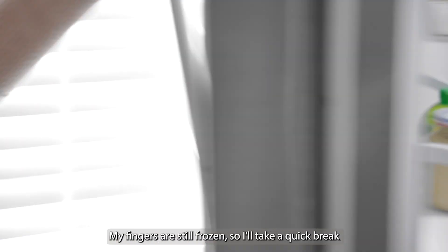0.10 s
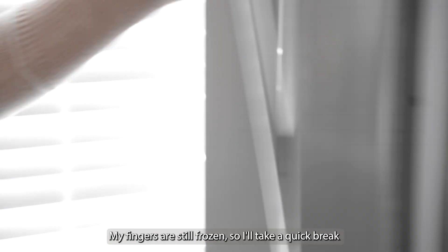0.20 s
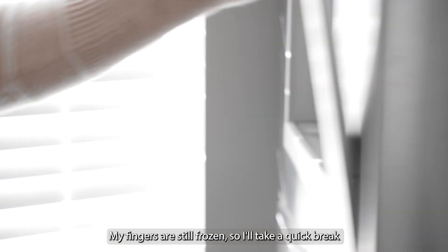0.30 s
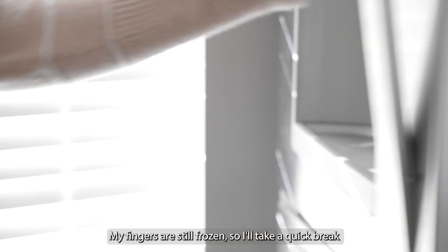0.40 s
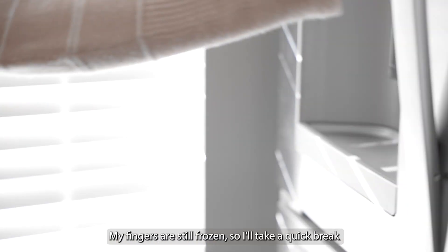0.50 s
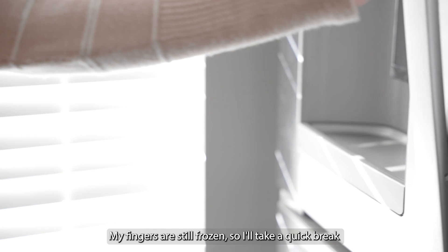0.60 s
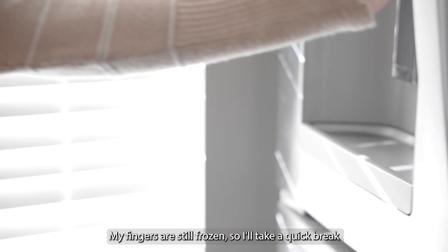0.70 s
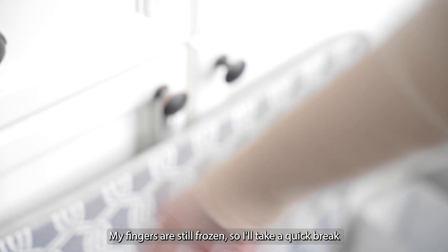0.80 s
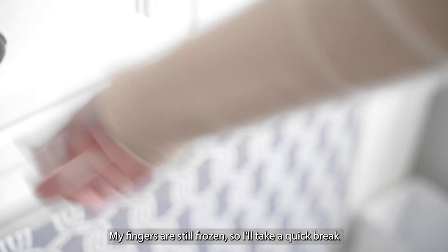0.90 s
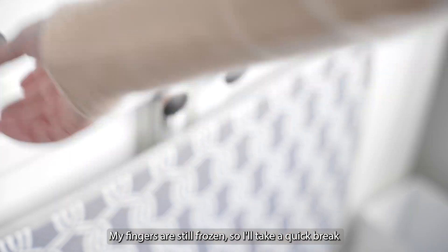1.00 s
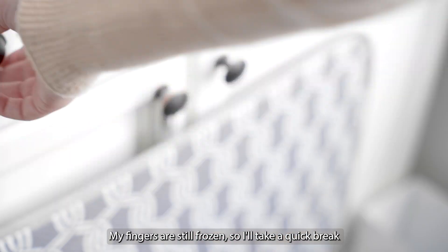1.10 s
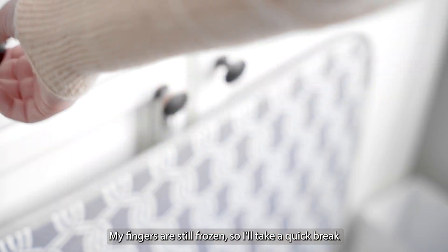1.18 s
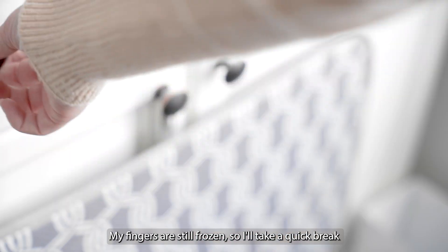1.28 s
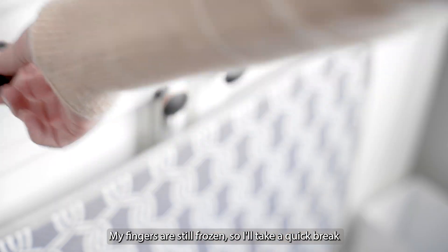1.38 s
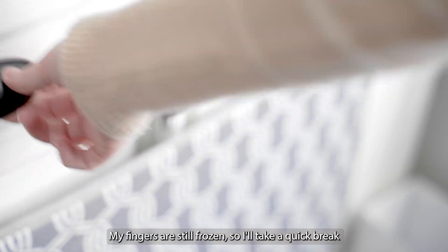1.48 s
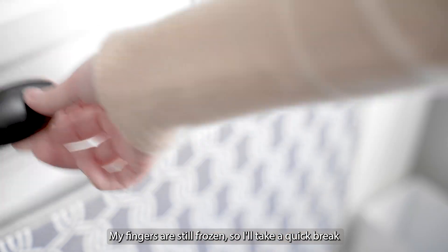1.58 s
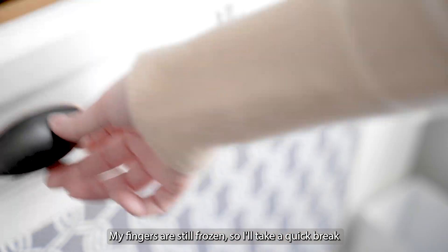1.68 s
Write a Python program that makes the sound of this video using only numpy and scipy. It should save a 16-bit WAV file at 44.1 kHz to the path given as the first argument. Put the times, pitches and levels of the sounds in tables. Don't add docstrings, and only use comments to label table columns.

```python
import sys
import numpy as np
from scipy import signal
from scipy.fft import rfft, irfft
from scipy.io import wavfile
from scipy.ndimage import uniform_filter1d

SR = 44100
rng = np.random.default_rng(int(sys.argv[2]) if len(sys.argv) > 2 else 0)


def voltage_ratio(decibels):
    exponent = np.asarray(decibels, float) / 20
    return 10 ** exponent


def master(y):
    cut = np.clip(np.atleast_2d(y).T, -1, 1)
    pcm = np.round(cut * 32767)
    wavfile.write(sys.argv[1], SR, pcm.astype(np.int16))


N = 74970


def evened(x):
    return x / np.sqrt(np.mean(x ** 2) + 1e-20)


def read(points, hz):
    table_hz, value = np.transpose(points)
    return np.interp(np.log(hz + 1), np.log(table_hz + 1), value)


def curve(rows, column=1):
    rows = np.array(rows)
    return np.interp(np.arange(N) / SR, rows[:, 0], rows[:, column])


def colour(x, points):
    hz, db = np.transpose(points)
    ends = [(1, db[0] - 30), *points, (hz[-1] * 1.5, db[-1] - 30)]
    log_gain = read(ends, np.fft.rfftfreq(8192, 1 / SR)) * np.log(10) / 20
    cepstrum = irfft(log_gain)
    cepstrum[1:4096] *= 2
    cepstrum[4097:] = 0
    taps = irfft(np.exp(rfft(cepstrum)))[:4096]
    return signal.oaconvolve(x, taps[None] / np.linalg.norm(taps), axes=1)[:, :N]


def resonate(x, hz, width):
    r = np.exp(-np.pi * width / SR)
    y = signal.lfilter([1, 0, -1], [1, -2 * r * np.cos(2 * np.pi * hz / SR), r * r], x)
    return y * np.sqrt((1 - r * r) / 2)


def body(x, modes):
    total = 0
    for k, (hz, width, db) in enumerate(modes):
        sign = (-1) ** k
        total = total + sign * voltage_ratio(db) * np.sqrt(width) * resonate(x, hz, width)
    return total / np.sqrt(sum(voltage_ratio(2 * db) * width for hz, width, db in modes))


# frequency in Hz, likeness from 0 to 1.
LIKENESS = [(60, 0.97), (150, 0.99), (300, 0.98), (600, 0.82), (1200, 0.62), (2500, 0.21), (8000, 0)]


def pair(spread_db):
    grain = voltage_ratio(spread_db * evened(uniform_filter1d(rng.standard_normal(N), 60)))
    a, b = rfft(rng.standard_normal((2, N)) * evened(grain))
    same = np.clip(read(LIKENESS, np.fft.rfftfreq(N, 1 / SR)), 0, 1)
    mid = np.sqrt((1 + same) / 2) * a
    side = np.sqrt((1 - same) / 2) * b
    return irfft(np.array([mid + side, mid - side]), N)


def decay(start, t60, rise_s=0.0023):
    t = np.maximum(np.arange(N) / SR - start, 0)
    return np.minimum(t / rise_s, 1) * voltage_ratio(-60 * t / t60)


def rung(rows, rise_s):
    t = np.arange(N) / SR
    return sum(voltage_ratio(db) * decay(s, t60, rise_s) * np.sin(2 * np.pi * hz * (t - s))
               for s, db, hz, t60 in rows)


# frequency in Hz, time to fall 60 dB in seconds.
ECHO_TIME = [(100, 0.92), (2000, 0.32), (16000, 0.15)]


def room(x):
    taps = np.zeros((2, SR // 2))
    slots = np.arange(160, SR // 2 - 20, 20)
    places = slots + rng.integers(0, 20, (2, len(slots)))
    signs = rng.choice([-1., 1.], (2, len(slots)))
    np.put_along_axis(taps, places, signs, 1)
    hz, t, z = signal.stft(taps, SR, nperseg=256)
    same = np.clip(read(LIKENESS, hz), 0, 1)[:, None]
    z = np.array([z[0], same * z[0] + np.sqrt(1 - same ** 2) * z[1]])
    fading = voltage_ratio(-60 * t / read(ECHO_TIME, hz)[:, None])
    tail = signal.istft(z * fading, SR, nperseg=256)[1]
    return signal.fftconvolve(x, tail / np.linalg.norm(tail[0]), axes=1)[:, :N]


# frequency in Hz, level in dB.
HISS_TONE = [(300, 3), (3000, -2), (11800, -4.5), (12300, 1.5), (15800, 1)]


def microphone_hiss():
    return voltage_ratio(-63) * colour(pair(0), HISS_TONE)


# frequency in Hz, level in dB.
DOOR_RUMBLE = [(25, -2), (180, -14), (300, -20), (900, -29), (2000, -32.5)]
# frequency in Hz, level in dB.
CORNER_RUMBLE = [(25, 0), (90, 4), (200, -9), (400, -12), (520, -37)]


def rumble(tone, level_db):
    return voltage_ratio(level_db) * colour(pair(0), tone)


# pitch in Hz, width in Hz, level in dB.
HUM_PARTS = [(270, 18, -2.5), (318, 16, -3.5), (394, 37, -9)]
# time in seconds, level in dB.
HUM_LOUDNESS = [(.6, -86.5), (.72, -63), (.9, -54.5), (1.05, -53.5), (1.2, -62.5)]


def compressor_hum():
    t = np.arange(N) / SR
    motor = voltage_ratio(2.5) * np.sin(2 * np.pi * 362.5 * t)
    shell = evened(body(pair(0), HUM_PARTS))
    return voltage_ratio(curve(HUM_LOUDNESS)) * (shell + motor)


# start in seconds, level in dB, fall time (60 dB) in seconds.
FINGER_TICKS = [
    (.872, -50, 0.04),
    (0.901, -53, 0.14),
    (0.959, -49, 0.13),
    (1.118, -45, 0.17),
]
# frequency in Hz, level in dB.
KNOB_TONE = [(400, 1), (580, 2.5), (820, -16), (1380, -4.5), (2600, -11), (5000, -27.5)]
# start in seconds, level in dB, fall time (60 dB) in seconds, centre in Hz.
RUB_PUFFS = [
    (0.984, -57.5, 0.32, 4900),
    (1.044, -51, 0.012, 12100),
]
# start in seconds, level in dB, pitch in Hz, fall time (60 dB) in seconds.
LOW_THUDS = [
    (.592, -44, 88.3, 0.29),
    (.957, -45, 1422, 0.048),
    (1.237, -32, 197.7, 0.16),
    (0.963, -26, 150, 0.042),
    (1.227, -30.5, 115.5, 0.26),
    (1.288, -36.5, 103.5, 0.24),
    (1.345, -31.5, 69.4, 0.23),
]


def fingers():
    noise = pair(3.6)
    touches = sum(voltage_ratio(db) * decay(s, t60, 0.0017) for s, db, t60 in FINGER_TICKS)
    out = colour(noise * touches, KNOB_TONE) + rung(LOW_THUDS, 0.0063)
    for s, db, t60, hz in RUB_PUFFS:
        tone = [(hz * 0.06, -5), (hz, 0), (hz * 1.7, -7)]
        out = out + voltage_ratio(db) * colour(noise * decay(s, t60, 0.0006), tone)
    return out


# start in seconds, level in dB.
CUTLERY_CLINKS = [
    (1.547, -46),
    (1.555, -41),
    (1.6, -47.5),
    (1.658, -28),
    (1.676, -41),
]
# frequency in Hz, level in dB.
STEEL_TONE = [(1250, 0), (2000, -8), (2650, 2), (3400, -4), (4320, 0), (4650, -9), (4950, -2), (5400, -18)]
# start in seconds, level in dB, pitch in Hz, fall time (60 dB) in seconds.
CUTLERY_RINGS = [
    (1.659, -41, 4323, .08),
    (1.659, -41, 4900, .05),
    (1.659, -42, 2650, .04),
    (1.555, -52, 4250, .04),
    (1.547, -56, 5300, .03),
]


def cutlery():
    clinks = sum(voltage_ratio(db) * decay(s, 0.062) for s, db in CUTLERY_CLINKS)
    return rung(CUTLERY_RINGS, 0.0009) + colour(pair(2.1) * clinks, STEEL_TONE)


# time in seconds, level in dB, brightness in dB per octave.
DRAWER_PULL = [(1.11, -85, -9.5), (1.13, -54.5, 3), (1.17, -56.5, -2.5), (1.22, -56, 0), (1.26, -54, 1.5),
               (1.33, -49.5, 0), (1.37, -45.5, 0), (1.42, -47, 1), (1.48, -45, 1.5), (1.54, -44.5, 2),
               (1.6, -45, 1.5), (1.7, -42.5, 2)]
# pitch in Hz, width in Hz, level in dB.
WOOD_PARTS = [(79.5, 47, 3.5), (180, 46, 2.5), (234, 35, 5), (317, 45.4, 6), (498, 140, -2), (590, 70, 6),
              (733, 180, -5.5), (1170, 83, -3.5), (1320, 100, -3.5), (1850, 360, -8), (2795, 830, -19.5)]
# frequency in Hz, level in dB.
RUNNER_TONE = [(40, -24), (230, -3.5), (600, -0.5), (850, -8), (2000, -15.5), (3500, -24.5), (6100, -29),
               (6600, -42), (9300, -34)]
# start in seconds, level in dB, pitch in Hz,
# fall time (60 dB) in seconds.
RUNNER_BUMPS = [(1.125, -48, 1110, 0.11), (1.165, -43, 189, 0.2), (1.227, -45, 1260, 0.094),
                (1.27, -41, 1940, .08), (1.309, -28.5, 253, .09), (1.361, -41, 535, 0.051),
                (1.385, -45, 783, 0.071), (1.395, -26.5, 249, 0.097), (1.404, -46, 1850, 0.089),
                (1.443, -31, 581, .09), (1.449, -28, 249.5, 0.079), (1.47, -36, 810, 0.094),
                (1.486, -28.5, 1110, 0.074), (1.488, -29, 247, 0.07), (1.515, -36, 252, .07),
                (1.524, -31, 807, .07), (1.535, -39, 1305, .08), (1.572, -32, 246, 0.088),
                (1.599, -31, 606, 0.094), (1.633, -30, 352.4, 0.12), (1.642, -30.5, 249.8, .07),
                (1.656, -26.5, 1225, 0.087), (1.66, -27, 543, 0.072), (1.678, -30, 1290, 0.088)]


def drawer():
    rub = pair(1.6) * voltage_ratio(curve(DRAWER_PULL))
    box = voltage_ratio(4) * colour(body(rub, WOOD_PARTS), [(30, 0.004), (4000, 0.0072)])
    rolling = box + voltage_ratio(-3) * colour(rub, RUNNER_TONE)
    hz, t, z = signal.stft(rolling, SR, nperseg=256)
    brightness = curve(DRAWER_PULL, column=2)[np.minimum((t * SR).astype(int), N - 1)]
    octaves = np.log2(np.maximum(hz, 320) / 320)[:, None]
    rolling = signal.istft(z * voltage_ratio(octaves * brightness), SR, nperseg=256)[1][:, :N]
    return rolling + rung(RUNNER_BUMPS, 0.0088)


# start in seconds, level in dB.
HANDLE_KNOCKS = [
    (0.127, -40.5),
    (0.144, -54),
    (.165, -56.5),
    (0.189, -42),
]
# frequency in Hz, level in dB.
HANDLE_TONE = [(380, -2), (680, 0.5), (950, -18.5), (1400, -5), (2400, -15.5), (3400, -22)]


def handle():
    knocks = sum(voltage_ratio(db) * decay(s, 0.18, 0.002) for s, db in HANDLE_KNOCKS)
    return colour(pair(3.5) * knocks, HANDLE_TONE)


# start in seconds, level in dB.
HARD_SNAPS = [
    (0.2168, -11),
    (0.223, -23.5),
    (0.3689, -18.5),
    (0.54, -20.5),
    (0.544, -19.5),
]


def snaps():
    x = np.zeros((2, N))
    for s, db in HARD_SNAPS:
        x[:, round(s * SR)] = 4 * voltage_ratio(db)
    return colour(x, [(300, -4.5), (1500, 7), (4000, -7.5), (12000, -25.5)])


# time in seconds, level in dB.
SEAL_LOUDNESS = [(0.215, -25), (.26, -36), (.33, -43), (0.401, -63.5), (0.53, -59.5), (0.546, -35),
                 (.59, -51.5)]


def seal():
    air = pair(0.44) * voltage_ratio(curve([(.213, -110), *SEAL_LOUDNESS]))
    return colour(air, [(2500, -5), (5000, -6.5), (9000, -5.0), (15900, -13.5)])


# pitch in Hz, width in Hz, level in dB.
DOOR_PARTS = [(180, 99, 0), (290, 7.4, 13), (344, 78, 1.5), (482.7, 23, 7), (600, 92, -5), (644, 110, 6.5),
              (840, 16, 1), (1130, 78, -19.5), (1130, 47.8, -13), (1406, 22, 2), (1614, 44, -22),
              (2000, 260, -8)]
# time in seconds, level in dB.
SHELF_SHAKE = [(.213, -87), (.22, -28.5), (.3, -19), (.4, -29), (.5, -29.5), (.59, -33.5)]
# frequency in Hz, level in dB.
SHELF_TONE = [(30, -10), (60, -17), (110, -10), (280, -8.5), (430, -21), (830, -6), (2000, -14.5),
              (9000, -42.5)]


def shelves():
    shake = pair(2.3) * voltage_ratio(curve(SHELF_SHAKE))
    return voltage_ratio(-2.5) * colour(shake, SHELF_TONE) + voltage_ratio(-5.5) * body(shake, DOOR_PARTS)


# start in seconds, blow level in dB, crack level in dB,
# chatter fall time (60 dB) in seconds.
DOOR_JOLTS = [
    (0.2158, -9, -18.5, 0.032),
    (0.227, -11.5, -15, 0.03),
    (.259, -24, -47.5, 0.066),
    (0.299, -29, -32.5, 0.11),
    (0.367, -22, -35.5, .1),
    (0.537, -20.5, -28.5, 0.087),
    (0.561, -37, -35, 0.058),
]
# frequency in Hz, level in dB.
PANEL_TONE = [(40, -45.5), (300, -14), (690, -4.5), (1460, -8.5), (2600, -14), (4500, -30), (9000, -67.5)]
# frequency in Hz, level in dB.
CRACK_TONE = [(2000, -6), (2700, -13), (3500, -15), (6800, -18.5), (15900, -28)]
# start in seconds, level in dB, pitch in Hz, fall time (60 dB) in seconds.
DOOR_RINGS = [(.128, -28.5, 319.6, 0.13), (.158, -32, 318, 0.1), (.187, -37.5, 324, 0.17),
              (.216, -2, 634, 0.04), (.216, -8, 331, 0.075), (.222, -7.5, 1456, 0.057),
              (.226, -11, 478.6, 0.079), (.232, -16.5, 290, 0.32), (.257, -8, 700, 0.09),
              (.300, -15.5, 175.3, 0.13), (.325, -15.5, 290, 0.11), (.325, -29, 54, 0.17),
              (.370, -18.5, 1251, 0.094), (.372, -28, 856, 0.033), (.405, -23, 284.7, 0.35),
              (.47, -23.5, 284.3, 0.38), (.530, -26, 221, 0.15), (.537, -18.5, 88, 0.076),
              (.540, -14, 590, 0.061), (.572, -27, 160, 0.16), (.455, -29, 180, 0.22),
              (.541, -23.5, 953, 0.1205), (.222, -17, 1975, .076), (.222, -14, 1138, .1),
              (.368, -17.5, 1412, .09), (.368, -18, 1834, 0.093), (.372, -22, 1085, .07),
              (.369, -25, 2060, .1), (.368, -21.5, 2470, .045), (.368, -25.5, 3140, .03),
              (.537, -40, 1290, .12), (.537, -30, 2060, .1), (.537, -26, 2937, .08), (.548, -22, 339, .15),
              (.560, -27.5, 817, 0.13), (.543, -30, 745, 0.059)]
# frequency in Hz, left minus right in dB.
DOOR_SIDE = [(100, 2), (250, 0), (600, -2.5), (1200, 1), (2500, -2), (9000, -3.5), (14000, -3.5)]


def door():
    blows = pair(6.3) * sum(voltage_ratio(db) * decay(s, t60) for s, db, crack_db, t60 in DOOR_JOLTS)
    cracks = pair(0.91) * sum(voltage_ratio(crack_db) * decay(s, 2.03 * t60, 0.00013)
                              for s, db, crack_db, t60 in DOOR_JOLTS)
    out = body(blows, DOOR_PARTS) + voltage_ratio(6) * colour(blows, PANEL_TONE)
    out = out + colour(cracks, CRACK_TONE) + snaps()
    out = out + rung(DOOR_RINGS, 0.004) + shelves() + seal()
    lean = voltage_ratio(read(DOOR_SIDE, np.fft.rfftfreq(N, 1 / SR)) / 2)
    return irfft(rfft(out) * [lean, 1 / lean], N)


def scene():
    change_s = 0.5905
    after = np.maximum(np.arange(N) / SR - change_s, 0)
    door_gain = voltage_ratio(np.minimum(after / 0.0012, 1) * -17 - 450 * after)
    near = door() + handle()
    far = fingers() + drawer() + cutlery()
    door_place = near + voltage_ratio(-9.5) * room(near) + rumble(DOOR_RUMBLE, -59.5)
    corner = far + voltage_ratio(-10) * room(far) + compressor_hum()
    corner = corner + rumble(CORNER_RUMBLE, -56) * (after > 0)
    return door_place * door_gain + corner + microphone_hiss()


def roll_off(x):
    return signal.sosfilt(signal.butter(12, 16000, fs=SR, output="sos"), x)


def record(dry):
    mid = dry.mean(0)
    high_pass = signal.butter(2, 200, 'high', fs=SR)
    side = signal.lfilter(*high_pass, (dry[0] - dry[1]) / 2)
    ports = np.array([mid + side, mid - side])
    ceiling = 1.6
    return roll_off(ceiling * np.tanh(ports / ceiling))


dry = scene()
out = record(dry)
master(out)
```